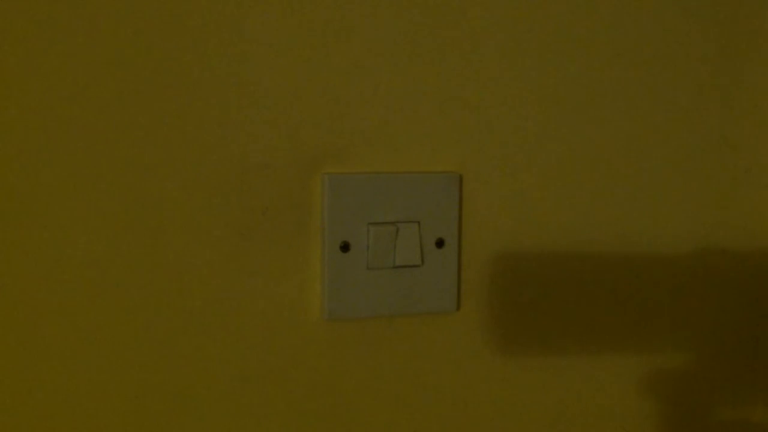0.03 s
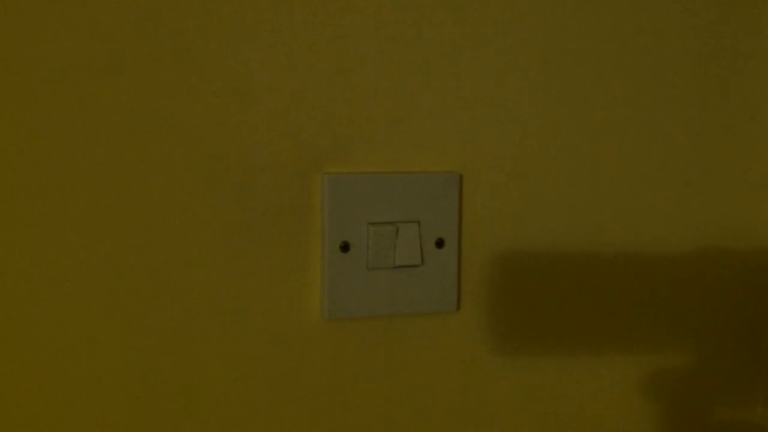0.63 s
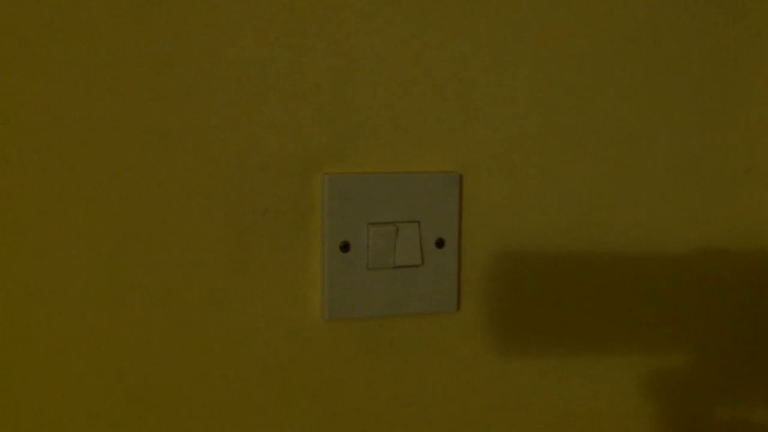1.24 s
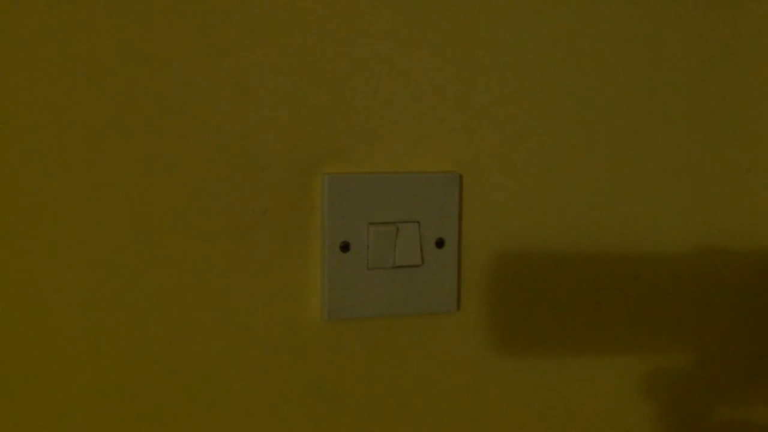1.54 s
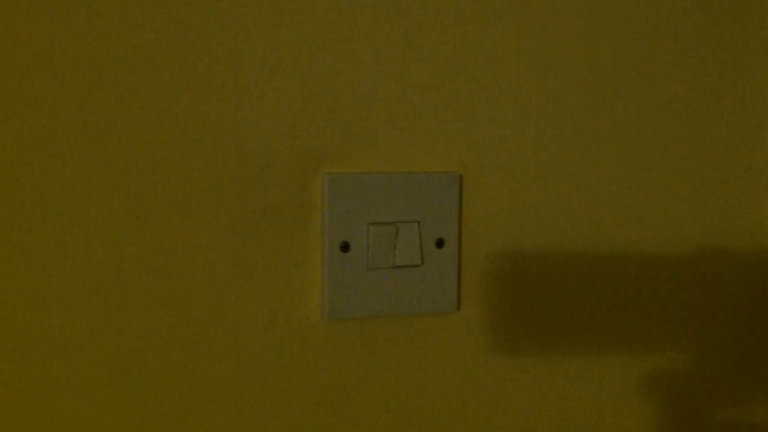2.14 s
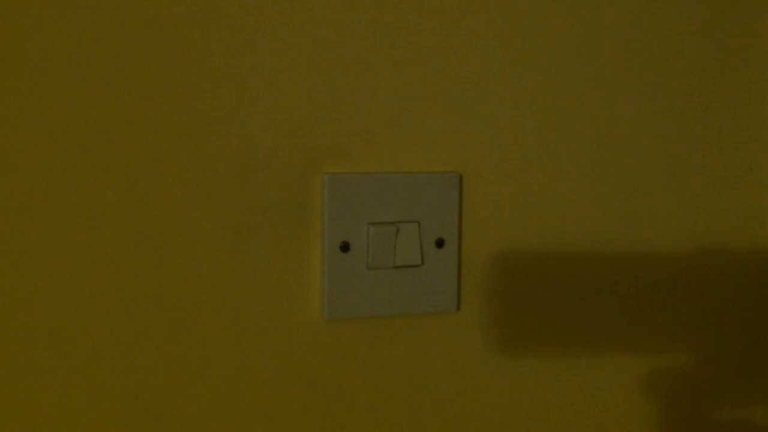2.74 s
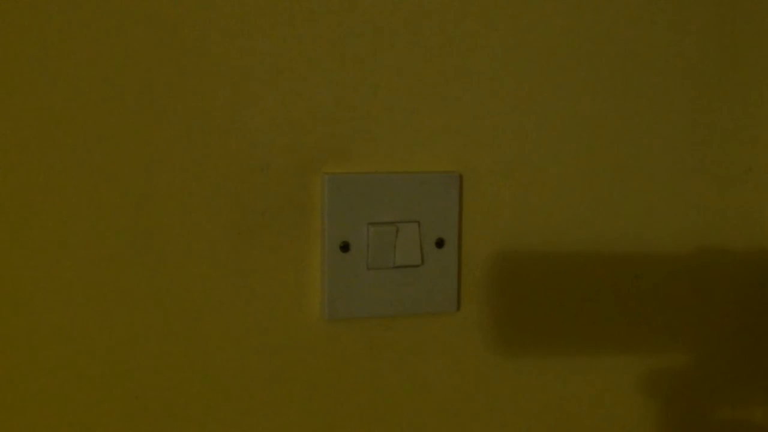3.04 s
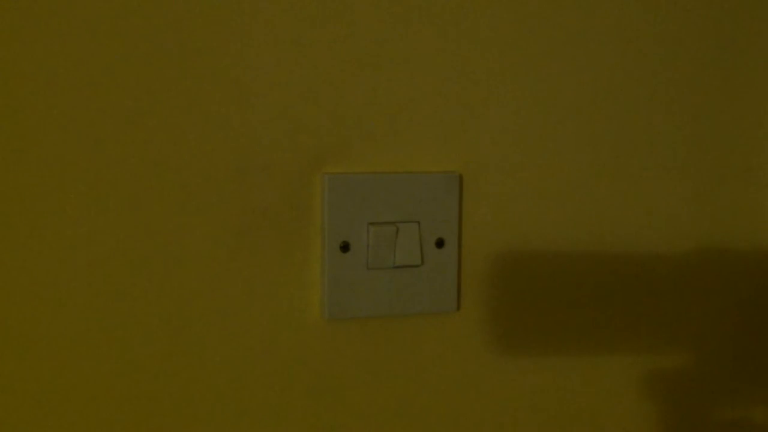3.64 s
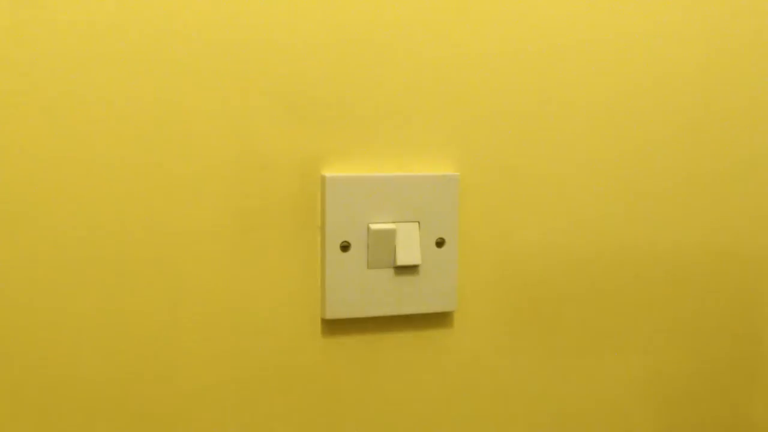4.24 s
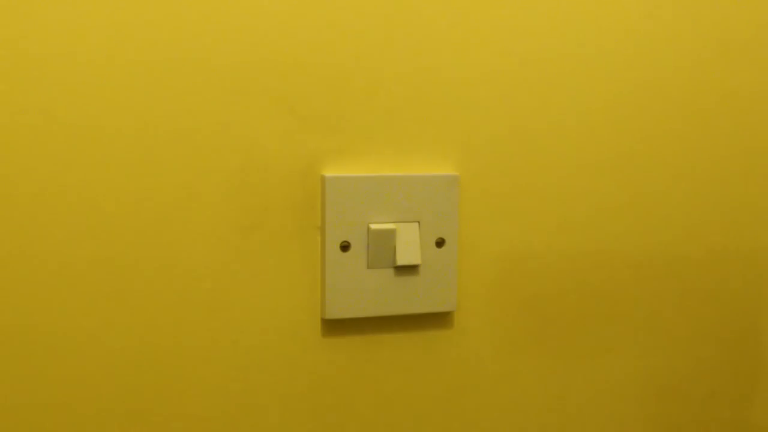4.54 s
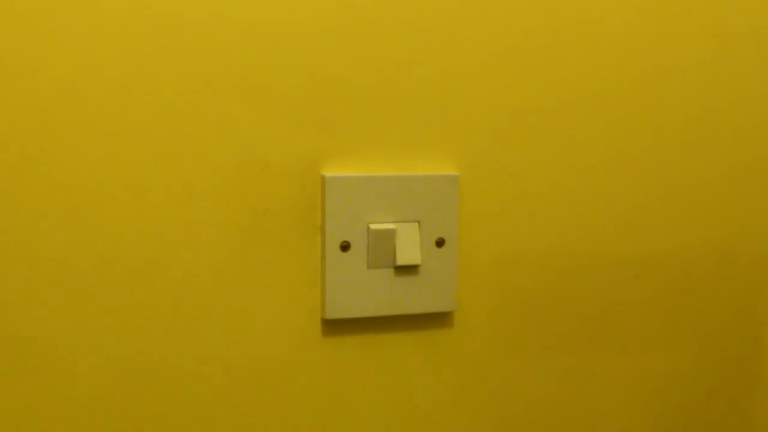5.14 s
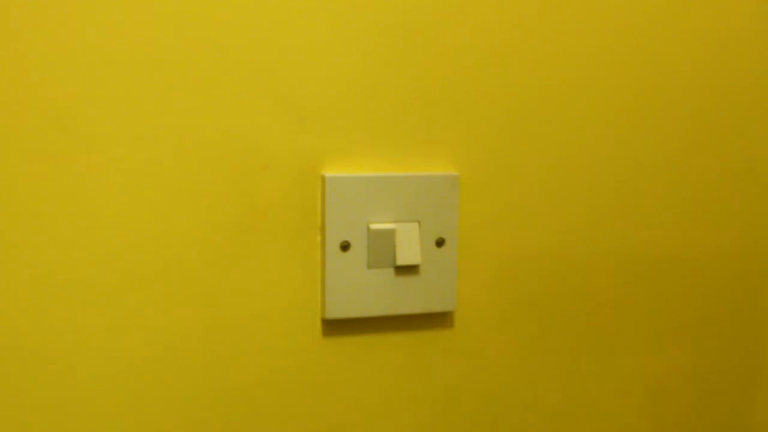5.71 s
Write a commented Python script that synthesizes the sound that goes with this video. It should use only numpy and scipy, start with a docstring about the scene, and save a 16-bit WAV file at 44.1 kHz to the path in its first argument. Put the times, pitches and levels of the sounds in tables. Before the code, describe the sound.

In a small, quiet room, a wall light switch is flipped with a single loud, crisp plastic click, heard in stereo from under half a metre. For four seconds before it there is only quiet handling noise: scattered ticks, soft finger knocks on a camera body and a faintly rustling sleeve. A few more light clicks and a short scuff come afterwards, all over faint microphone hiss.

```python
"""A sleeve's rustle, dull knocks and small bright clicks, right at the microphones: fingers shift on a
hand-held camera and ring its hollow body and hard shell. Four seconds in, a plastic rocker switch on the
wall snaps over once, loudly. The place is a small, quiet room, the stereo pair facing the wall from under
half a metre. The wall answers each hit within milliseconds, the room rings briefly, the microphones hiss."""
import sys
import numpy as np
from scipy import signal
from scipy.fft import rfft, irfft
from scipy.io import wavfile
from scipy.ndimage import uniform_filter1d

SR = 44100
rng = np.random.default_rng(int(sys.argv[2]) if len(sys.argv) > 2 else 0)


def transcribe(signal):
    """Save signal, clipped to [-1, 1], as a 16-bit WAV file at the path in sys.argv[1]."""
    frames = np.atleast_2d(signal).T
    limited = np.clip(frames, -1, 1)
    pcm = np.round(limited * 32767).astype(np.int16)
    wavfile.write(sys.argv[1], SR, pcm)


N = 254456
T = np.arange(SR // 2) / SR  # the half second in which one hit rings out

# The camera's hollow body under a soft finger. Each row: mode in Hz, t60 in seconds, energy in dB.
BODY_MODES = [(340, 0.025, -19), (722, 0.12, -12), (785, 0.05, 0), (870, 0.03, -13), (1060, 0.03, -8),
              (1190, 0.03, -8), (2550, 0.01, -24)]
# The camera's hard shell. Each row: mode in Hz, t60 in seconds, energy in dB.
SHELL_MODES = [(722, 0.2, -9), (785, 0.06, -3), (900, 0.045, -4), (1150, 0.03, -3), (1560, 0.07, -4),
               (1625, 0.08, -5), (2220, 0.04, -8), (2410, 0.06, -4), (2620, 0.04, -4), (2830, 0.06, -8),
               (3630, 0.07, -8), (4140, 0.06, -7), (4330, 0.06, -3), (5210, 0.07, -14), (5980, 0.06, -19),
               (6400, 0.04, -17), (7780, 0.06, -18), (8500, 0.03, -15), (9280, 0.05, -15),
               (10700, 0.03, -19), (11500, 0.03, -21), (13300, 0.025, -23)]


def switch():
    """The sprung rocker snaps over; its gritty impacts ring the plate and the wall box."""
    # The rocker leaves its rest, hits its stop and bounces.
    # Each row: start in seconds, force in dB, contact time in seconds.
    impacts = [(4.0437, -0.5, 0.0001), (4.0456, 4, 0.000027), (4.0493, -4.5, 0.00003),
               (4.0526, -11.5, .000012)]
    # The clear ring of plate and box. Each row: mode in Hz, t60 in seconds, energy in dB.
    plate_modes = [(722, .3, -11), (768, .07, -9), (1050, .015, -18), (1502, .08, -6), (1550, .06, -7),
                   (1606, .07, -4), (1661, .15, 0), (1826, .16, -13), (2118, .05, -10), (2268, .08, -9),
                   (2331, .11, -1), (2410, .08, -8), (2536, .1, -10), (2617, .08, -8), (2774, .08, -13),
                   (3631, .12, -12), (3792, .1, -15), (4265, .03, -6), (4428, .09, -4), (6020, .07, -13),
                   (6430, .05, -23), (7780, .05, -20), (8260, .025, -10), (8550, .025, -5),
                   (9400, .02, -13), (10850, .015, -15)]
    # Crowds of heavily damped modes. Each row: low edge in Hz, high edge in Hz, energy in dB.
    clack_bands = [(850, 1200, -14.5), (1315, 3000, -4), (4020, 4510, -11.5), (4610, 10200, -9.5),
                   (9750, 14100, -13)]
    out, push, start = np.zeros((2, N)), 0, impacts[0][0]
    for s, force_db, contact_s in impacts:
        grit = crack(t60=.012)
        pulse = signal.lfilter([1], [1, -np.exp(-1 / (contact_s * SR))], grit)  # longer contact is duller
        push = push + undb(force_db) * np.roll(unit(pulse), int((s - start) * SR))
    drive = room(push, wall_db=-4, near_db=1, tail_db=-4)
    clack = sum(undb(db) * unit(band(drive, lo, hi, order=5)) for lo, hi, db in clack_bands)
    # the small plate radiates little bass; only the wall behind it gives a faint thump
    plate = band(resonate(drive, plate_modes) + clack, 670, 16000, order=6)
    thump = undb(-40) * unit(band(drive, 85, 190)) + undb(-31.5) * unit(band(drive, 315, 465))
    add(out, start, unit(plate + thump) * held(db=-20.5, length_s=0.019))
    return out


def clicks():
    """The casing's joints slip; where they slip sets how much thud, clack, clink and tick ring out."""
    # Each row: time in seconds, clack level in dB, thud and tick against it in dB, the joint's ping in Hz.
    slips = [(0.2132, -46, -6, 4, 3696), (0.32, -44, 3, -8.5, 1646), (0.806, -46.5, -1.5, -6.5, 1618),
             (0.983, -51, 4, -6, 4450), (1.2207, -40, 2.5, -7, 2833), (1.604, -54, 2.5, -2, 1400),
             (2.4167, -39.5, -2.5, -3, 1593), (2.8264, -45.5, 5.5, -2, 2616),
             (4.318, -54, -5.5, -8.5, 1437), (4.551, -56, 12.5, 0, 4280), (4.6514, -50.5, -5, 5.5, 8800),
             (4.7675, -51.5, 10.5, -8, 1050), (5.0825, -38.5, -8.5, -8.5, 6680),
             (5.132, -34.5, -4.5, -13.5, 4277)]
    bands_hz = [(705, 1300), (1300, 2900), (3400, 6000), (6000, 14000)]  # thud, clack, clink, tick
    ping_db, ping_cycles = 1, 150
    out = np.zeros((2, N))
    for s, db, thud_db, tick_db, ping_hz in slips:
        drive = room(crack(t60=0.011), wall_db=6.5, near_db=9.5, tail_db=1.5)
        # each spot favours other modes
        modes = [(hz, t60, mode_db + 2 * rng.standard_normal()) for hz, t60, mode_db in SHELL_MODES]
        bare_crack = undb(1.5) * unit(band(drive, 470, 15800, order=2))
        shell = resonate(drive, modes) + bare_crack
        clink_db = -2.5 + 0.43 * tick_db  # a sharper slip is brighter throughout
        click = sum(undb(part_db) * unit(band(shell, lo, hi, order=4))
                    for (lo, hi), part_db in zip(bands_hz, [thud_db, 0, clink_db, tick_db]))
        ping = undb(ping_db) * resonate(band(drive, 720, 22500), [(ping_hz, ping_cycles / ping_hz, 0)])
        jolt = undb(-27.5) * unit(band(drive, 115, 290, order=2))  # the whole camera moves
        add(out, s - .0005, (click + ping + jolt) * held(db, length_s=0.0039))
    return out


def knocks():
    """Each knock is one soft push of a fingertip: mostly on the camera's grip, and once, just before the switch
    snaps, on the rocker."""
    # Each row: start in seconds, level in dB, upper against lower body modes in dB.
    pushes = [(0.172, -45.5, -9), (0.186, -51, 5), (0.602, -60, -5), (0.6861, -46.5, -16),
              (0.8993, -42.5, -11), (0.913, -45, -10), (0.9735, -46.5, -2), (1.8716, -37.5, -4.5),
              (2.158, -60.5, -15), (2.402, -54.5, -8), (2.7334, -39.5, -3), (2.7803, -36, -21),
              (2.859, -38, -5), (4.03, -52.5, -6), (4.25, -56, -13), (4.593, -50, 10)]
    out = np.zeros((2, N))
    for s, db, upper_db in pushes:
        knock = touch(np.exp(-T / 0.0001), upper_db)
        add(out, s, unit(knock) * held(db, length_s=0.011))
    return out


def touch(push, upper_db):
    """A soft finger rings mainly the low modes of the hollow body, with a faint tick of contact."""
    # the body radiates forwards: its echo off the wall is stronger than the direct sound
    drive = room(push, wall_db=5, near_db=5, tail_db=-.5)
    modes = [(hz, t60, db + upper_db * (950 < hz < 1400)) for hz, t60, db in BODY_MODES]
    thud = resonate(drive, modes) + undb(-9) * unit(band(drive, 680, 1400))
    tick = undb(-18.5) * unit(band(drive, 1300, 4000, order=2))
    jolt = undb(-35) * unit(band(drive, 133, 260, order=2))
    # a fingertip is too soft to pass on much treble
    return band(thud, 430, 1700, order=2) + tick + jolt


def scuffs():
    """Skin slides off the casing: a dying hiss and a low bump of the hand."""
    # Each row: start in seconds, level in dB, t60 in seconds, bump against hiss in dB.
    slides = [(1.939, -66, .05, 25), (5.647, -53, 0.24, -14.5)]
    out = np.zeros((2, N))
    for s, db, t60, bump_db in slides:
        drive = room(crack(t60), wall_db=-27, near_db=-7, tail_db=-8)
        skin = unit(band(drive, 310, 4600, order=1))
        bump = undb(bump_db) * unit(band(drive, 325, 600, order=2))
        add(out, s, unit(skin + bump) * held(db, length_s=0.066))
    return out


def sleeve():
    """Cloth fibres catch and let go in quick uneven grains, ringing the shell and stirring the body."""
    # Each row: peak of a stroke in seconds, length in seconds, level in dB.
    strokes = [(0.143, 0.14, -52), (0.582, 0.067, -60), (0.8, 0.46, -64), (1.207, 0.054, -58.5),
               (1.474, 0.045, -63), (1.731, 0.088, -55.5), (2.153, 0.14, -63.5), (3.204, 0.12, -58.5),
               (3.346, 0.16, -66), (3.9, 0.23, -61.5), (4.76, 0.17, -63)]
    # The colour of rubbed cloth. Each row: frequency in Hz, level in dB.
    cloth = [(150, -18.5), (500, -24), (1100, -10.5), (1550, -13), (3100, -8.5), (4300, -4.5),
             (5200, -12.5), (6000, -5.5), (7000, -7.5), (8400, -1), (9600, -7.5), (10700, -1.5),
             (13500, -1.5), (15500, -11)]
    t = np.arange(N) / SR
    shape = 1.5  # between a pointed (1) and a bell-shaped (2) swell
    swell = sum(undb(db) * np.exp(-np.abs(2 * (t - s) / length) ** shape) for s, length, db in strokes)
    grain = uniform_filter1d(rng.standard_normal(N), size=150)
    fibres = noise(cloth, N, spacing_m=0.0192) * undb(2.4 * grain / grain.std())
    # fine fibres drive the high modes hardest
    modes = [(hz, t60, np.interp(hz, *np.transpose(cloth)) + 7 * np.log10(hz))
             for hz, t60, _ in SHELL_MODES]
    shell = resonate(fibres, modes)
    body = resonate(fibres, BODY_MODES)
    rub = fibres + undb(-2) * shell / shell.std() + undb(-17) * body / body.std()
    return swell * rub / rub.std()


def fidgets():
    """While the grip resettles, faint touches of uneven strength land at random."""
    # Each row: start in seconds, end in seconds, level in dB.
    spells = [(0, 0.039, -62.5), (0.279, .58, -64.5), (0.732, 1.08, -68.5), (1.469, 1.51, -61.5),
              (3.745, 3.87, -67.5), (4.682, 5.027, -73.5)]
    touches_per_s, spread_db = 110, 3
    out, t = np.zeros((2, N)), np.arange(SR) / SR
    for start, end, db in spells:
        lands = (t == 0) | ((rng.random(SR) < touches_per_s / SR) & (t < end - start))
        pushes = lands * undb(spread_db * rng.standard_normal(SR))
        add(out, start, unit(touch(pushes, upper_db=-11)) * held(db, end - start))
    return out


def room(x, wall_db, near_db, tail_db):
    """Direct sound, the echo off the wall in front, scatter from things nearby and the room's tail."""
    # The small room's decay. Each row: frequency in Hz, t60 in seconds.
    decay = [(150, 0.44), (700, 0.39), (2000, 0.39), (4500, 0.39), (8000, 0.35), (14000, 0.053)]
    wall_s = .00257  # to the wall, 44 cm away, and back
    diffuse = noise([(100, 0.019), (10000, 0.0091)], len(T), spacing_m=0.027)
    hz = np.fft.rfftfreq(len(T), 1 / SR)
    centres_hz, t60s = np.transpose(decay)
    # overlapping bands, each dying away at its own rate
    shares = [np.interp(hz, centres_hz, row) for row in np.eye(len(decay))]
    tail = sum(irfft(rfft(diffuse) * share, len(T)) * fade(t60) for share, t60 in zip(shares, t60s))
    scatter = diffuse[:, ::-1] * fade(t60=0.13)
    path = (undb(near_db) * unit(scatter) + undb(tail_db) * unit(tail)) * (T > wall_s)
    path[:, 0] += 1
    path[:, int(wall_s * SR)] += undb(wall_db)
    return signal.fftconvolve(x[None], path, axes=1)[:, :len(x)]


def hiss():
    """The microphones' steady hiss over the still room."""
    # Each row: frequency in Hz, relative level in dB.
    colour = [(20, -11), (40, -20), (230, -13.5), (450, -3), (750, -4), (1400, -5), (2800, -6),
              (4500, -8.5), (15000, -9)]
    return undb(-64.5) * noise(colour, N, spacing_m=0.44)


def noise(colour, size, spacing_m):
    """Diffuse noise of a given colour at two spaced microphones: alike in the bass, not in the treble."""
    hz = np.fft.rfftfreq(size, 1 / SR)
    at_hz, db = np.transpose(colour)
    gain = undb(np.interp(np.log(hz + 1), np.log(at_hz), db))
    alike = np.sinc(2 * hz * spacing_m / 343)
    mid, side = rfft(rng.standard_normal((2, size))) * np.sqrt([1 + alike, 1 - alike])
    x = irfft(np.array([mid + side, mid - side]) * gain, size)
    return x / x.std()


def crack(t60):
    """The short, rough push of a slipping contact, its energy spread evenly over all frequencies."""
    spectrum = rfft(rng.standard_normal(len(T)) * fade(2 * t60))
    return irfft(spectrum / np.abs(spectrum), len(T)) * fade(2 * t60)


def resonate(drive, modes):
    """Each mode is a resonator that takes its share of the energy."""
    out = 0
    for hz, t60, db in modes:
        r = np.exp(-np.log(1000) / (t60 * SR))
        ring = signal.lfilter([1, 0, -1], [1, -2 * r * np.cos(2 * np.pi * hz / SR), r * r], drive)
        out = out + undb(db) * unit(ring)
    return unit(out)


def band(x, lo_hz, hi_hz, order=3):
    """Causal band-pass."""
    sos = signal.butter(order, [lo_hz, min(hi_hz, .49 * SR)], "band", fs=SR, output="sos")
    return signal.sosfilt(sos, x)


def fade(t60):
    """Exponential decay, 60 dB down after t60 seconds."""
    return np.exp(-np.log(1000) * T / t60)


def undb(db):
    """Decibels to gain."""
    return 10 ** (np.asarray(db) / 20)


def unit(x):
    """Scale to a mean energy of one per channel."""
    return x / np.sqrt(np.mean(np.sum(x ** 2, axis=-1)))


def held(db, length_s):
    """The gain that gives a unit hit the energy of a level held for a short time."""
    return undb(db) * np.sqrt(length_s * SR)


def add(out, s, x):
    """Mix a sound in at s seconds."""
    i = int(s * SR)
    out[:, i:i + x.shape[1]] += x[:, :N - i]


def scene():
    """The switch on the wall and the handling noise at the microphones, over the hiss."""
    return switch() + knocks() + clicks() + scuffs() + sleeve() + fidgets() + hiss()


def record(dry):
    """The left microphone favours the mids, the right the treble and hears sooner; the top is cut."""
    left_lag_s, top_hz = 1e-5, 15300
    hz = np.fft.rfftfreq(N, 1 / SR)
    lean_db = np.interp(hz, [200, 700, 1500, 4200, 8000], [0, 1.7, 1, 2.2, -2.8])  # left against right
    left = undb(lean_db / 2) * np.exp(-2j * np.pi * hz * left_lag_s)
    right = undb(-lean_db / 2)
    pair = irfft(rfft(dry) * np.array([left, right]), N)
    return signal.sosfilt(signal.ellip(10, .2, 70, top_hz, fs=SR, output="sos"), pair)


dry = scene()
out = record(dry)
transcribe(out)
```